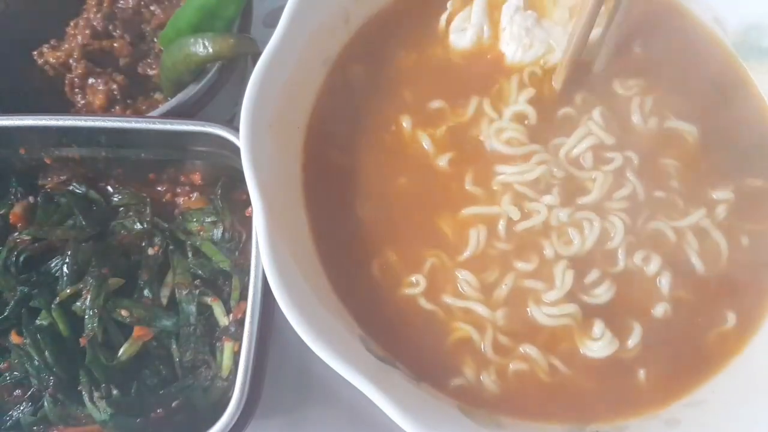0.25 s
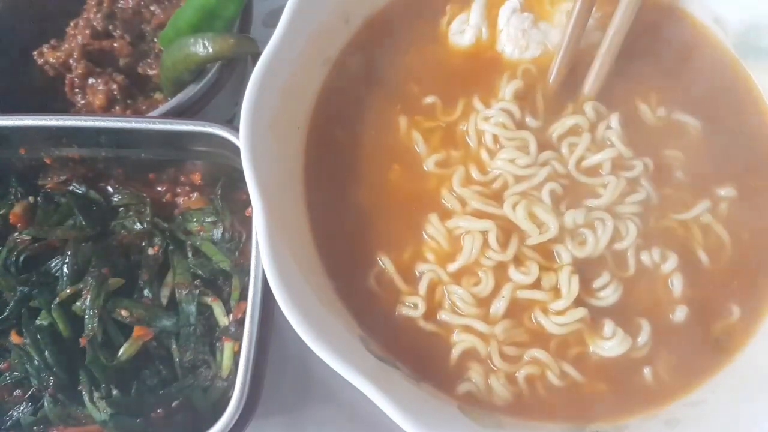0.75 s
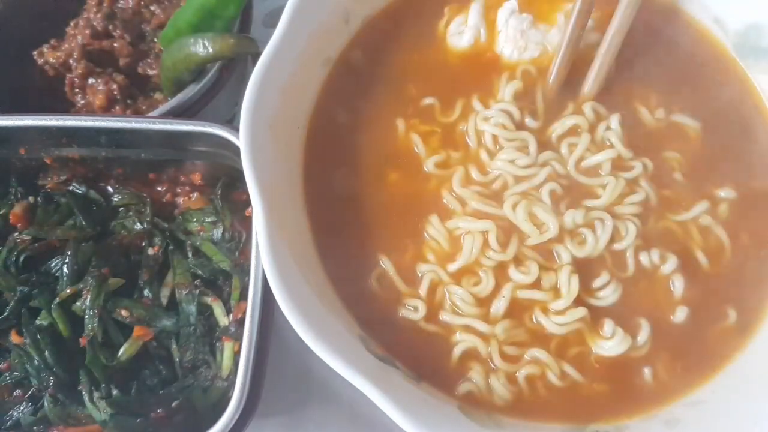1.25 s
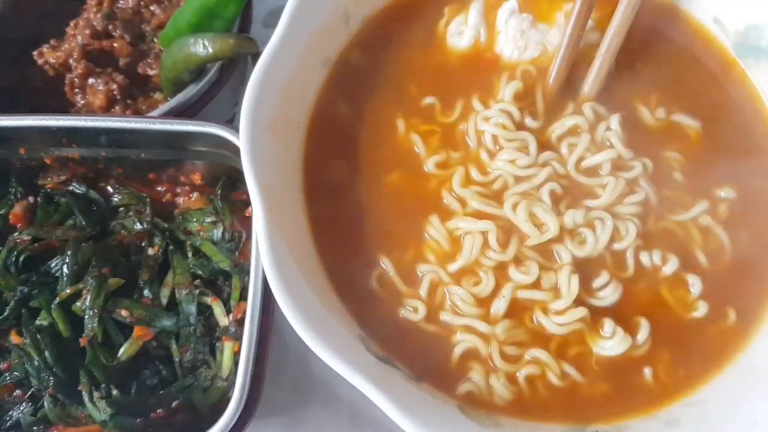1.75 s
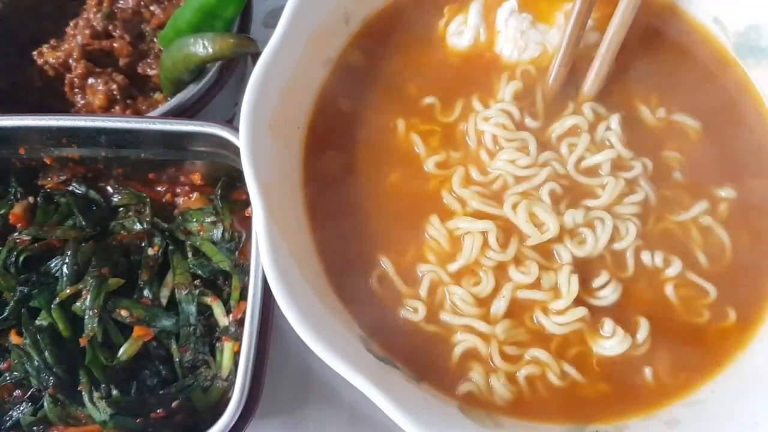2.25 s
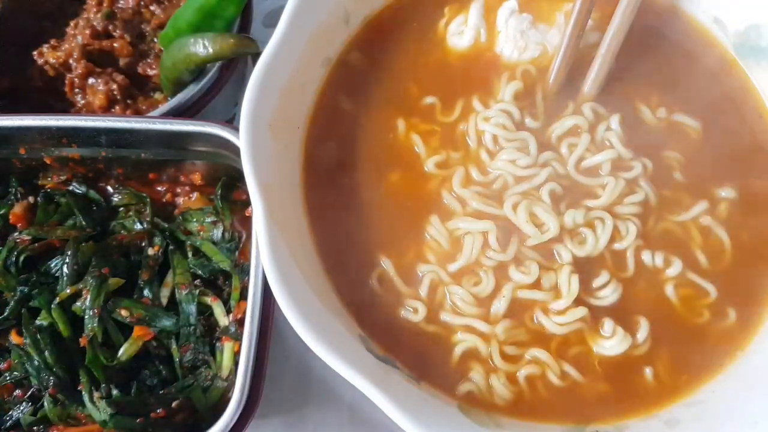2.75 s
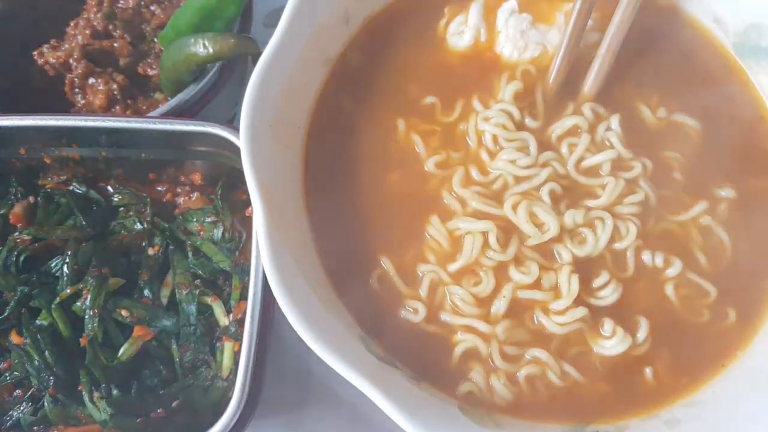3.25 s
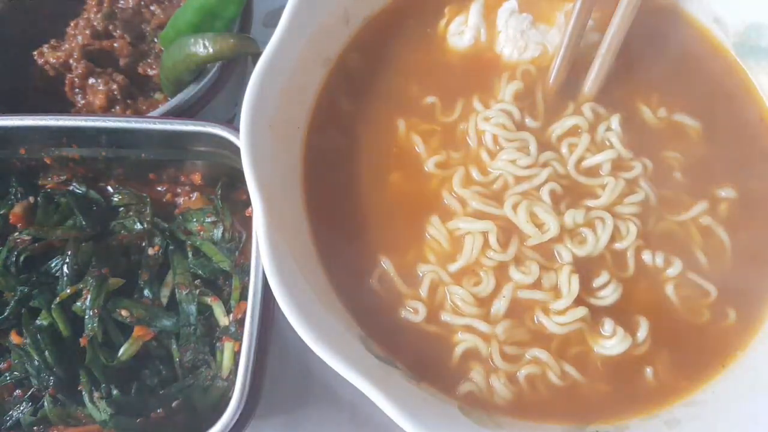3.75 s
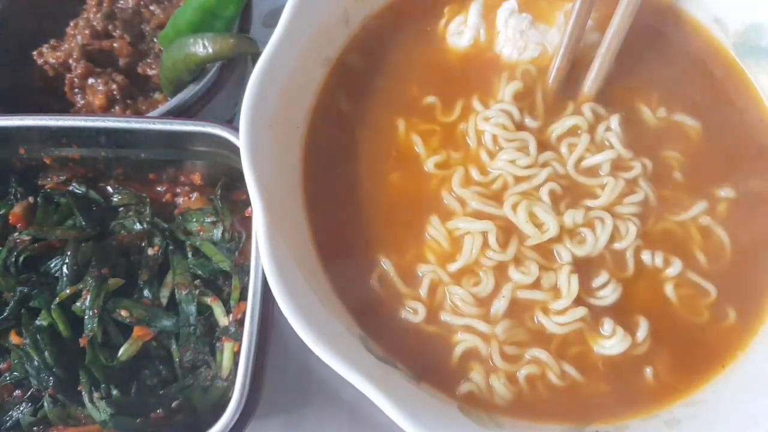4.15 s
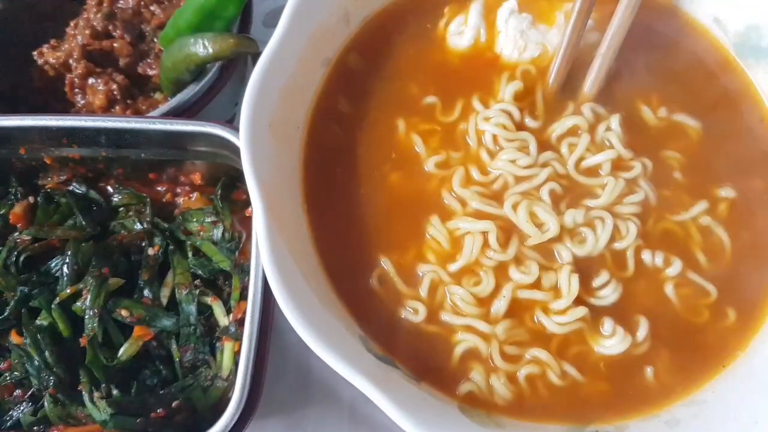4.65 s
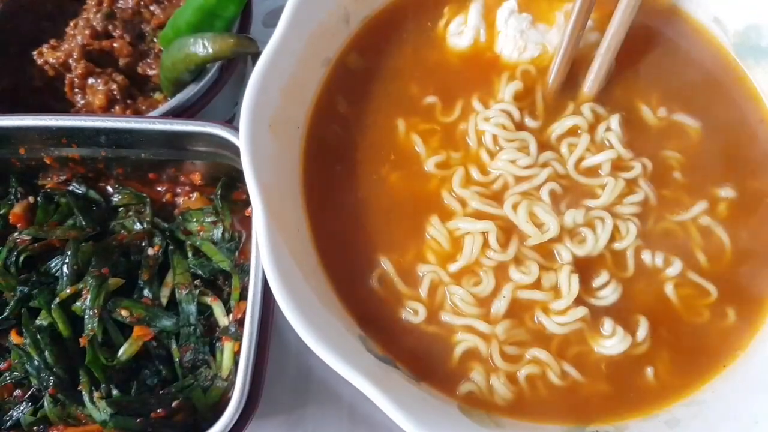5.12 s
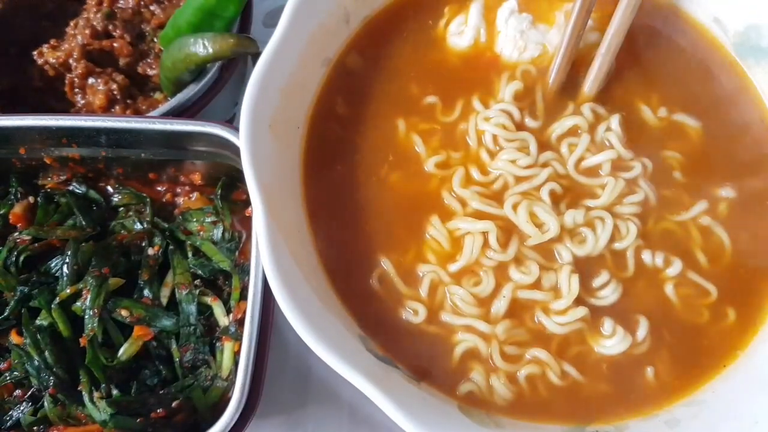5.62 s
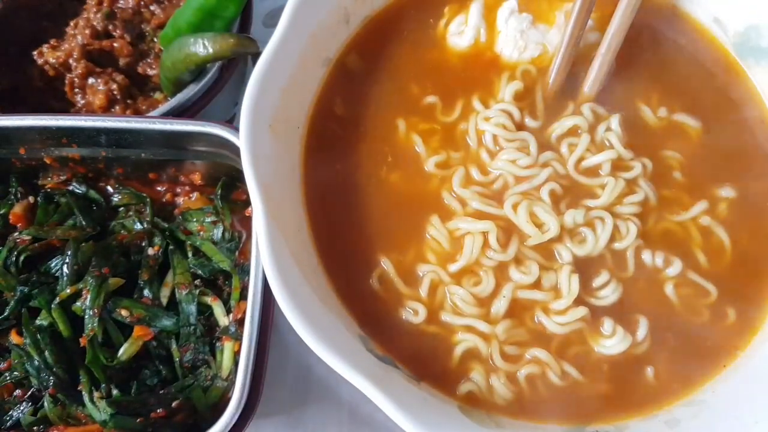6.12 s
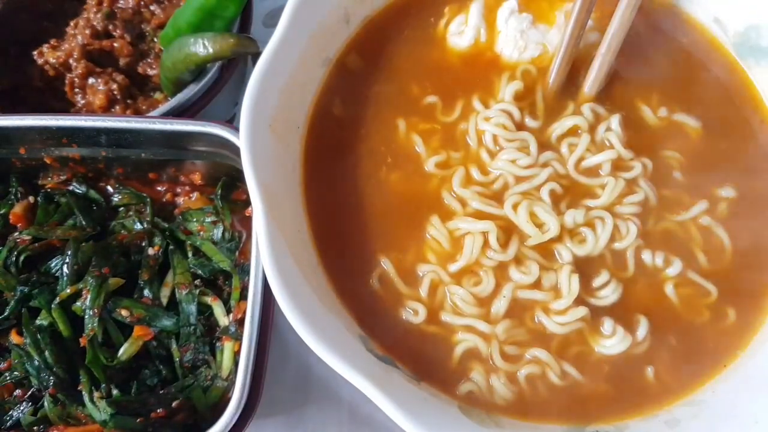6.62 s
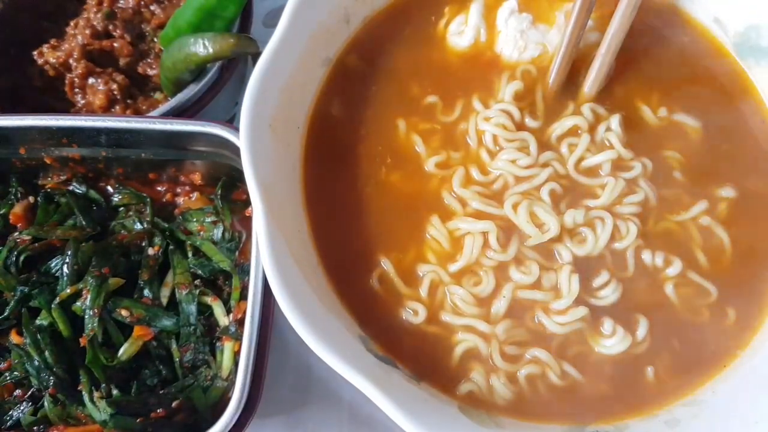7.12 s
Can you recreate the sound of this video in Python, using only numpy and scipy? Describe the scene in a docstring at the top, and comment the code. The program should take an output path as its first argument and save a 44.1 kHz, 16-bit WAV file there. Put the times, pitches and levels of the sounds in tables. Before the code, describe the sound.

After a dish is set down and a quiet pause, wooden sticks click, rub and knock on a ceramic bowl, then a soft hiss remains.

```python
"""Chopsticks click against a ceramic bowl on a table, close by in a small hard room.
Each contact is a short hollow clack, a bright snap of noise and a knock of the bowl, which rings on faintly.
Bumps ring the table top, a dish is set down at the start, and sliding sticks rub and catch.
Below: filtered-noise rumble, hiss, brushing and rustles, sine-wave hum and whine, faint taps and rings."""
import sys
import numpy as np
from scipy import signal
from scipy.fft import rfft, irfft, next_fast_len
from scipy.io import wavfile
from scipy.ndimage import map_coordinates

SR = 44100
rng = np.random.default_rng(int(sys.argv[2]) if len(sys.argv) > 2 else 0)


def to_wav(sig):
    """Store sig (one row per channel, or 1-D mono) as 16-bit WAV at the path in sys.argv[1].

    Samples outside -1..1 are clipped; the rate is SR.
    """
    pcm = np.clip(np.atleast_2d(sig), -1, 1) * 32767
    pcm = np.round(pcm).astype(np.int16)
    wavfile.write(sys.argv[1], SR, pcm.T)  # frames by channels


N = 325458  # length of the scene [samples]

# Levels in the tables are relative: each function sets how loud its own sound ends up.


def amp(db):
    """Turn decibels into a gain."""
    return np.exp(np.asarray(db) * (np.log(10) / 20))


def unit(x):
    """Scale to rms 1."""
    return x / np.sqrt(np.mean(x ** 2) + 1e-20)


def along(points, hz):
    """Read a curve of (Hz, value) points at any frequency, on a log axis."""
    f, v = np.transpose(points)
    return np.interp(np.log(hz + 1), np.log(f + 1), v)


def curves(rows):
    """Join the points of each column after the time into one value per sample."""
    times, *columns = np.transpose(rows)
    return [np.interp(np.arange(N) / SR, times, column) for column in columns]


def wobble(rate):
    """Draw a smooth random curve with this many random points a second."""
    points = rng.standard_normal(int(N * rate / SR) + 4)
    return map_coordinates(points, [np.arange(N) * rate / SR])


def filtered(x, response):
    """Change the sound's spectrum by a response, given as a function of frequency."""
    n = x.shape[-1]
    m = next_fast_len(n + 8192)  # spare room so that echoes do not wrap round
    return irfft(rfft(x, m) * response(np.fft.rfftfreq(m, 1 / SR)), m)[..., :n]


def add(track, s, sound):
    """Mix a sound into the track at time s."""
    start = max(round(s * SR), 0)
    track[..., start:start + sound.shape[-1]] += sound[..., :N - start]


def struck(modes, detune, chatter, chatter_t60, alternate=True):
    """A blow and its brief chatter ring fading tones; alternating signs swell, equal signs start at once."""
    t = np.arange(SR // 8) / SR
    hz, db, t60 = np.transpose(modes)[:, :, None]
    pitch, level = rng.standard_normal((2, len(modes), 1))
    sign = (-1) ** np.arange(len(modes))[:, None] if alternate else 1
    tones = np.sin(2 * np.pi * hz * (1 + detune * pitch) * t)
    ring = (sign * amp(db + 2.2 * level - 60 * t / t60) * tones).sum(0)
    force = rng.standard_normal(len(t)) * amp(-60 * t / chatter_t60)
    force *= chatter / np.linalg.norm(force)
    force[0] += 1  # the blow itself
    sound = signal.fftconvolve(ring, force)[:len(t)]
    return sound / np.linalg.norm(sound)  # energy 1


# how long the room rings: (frequency [Hz], time to fade 60 dB [s])
ROOM_FADE = [(150, 0.11), (500, 0.47), (1400, 0.41), (3700, 0.34), (10000, 0.38), (15000, 0.1)]
# how strongly the room answers: (frequency [Hz], level [dB])
ROOM_COLOUR = [(100, -6.5), (400, 3.5), (1300, -1), (2500, -1.3), (5000, 0), (7800, -5), (10000, -5),
               (14000, -5.5)]


def room(bands, gap=0.0045, build=0.0018):
    """The walls answer with fading noise in bands (Hz, octaves, dB), unrelated at the two microphones."""
    hz, t, noise = signal.stft(rng.standard_normal((2, SR * 3 // 5)), SR, nperseg=256)
    power = np.zeros(len(hz))
    for centre, octaves, db in bands:
        shape = np.exp(-.5 * (np.log2((hz + 1) / centre) / octaves) ** 2)
        power += amp(db) ** 2 * shape / shape.mean()
    decay = amp(-60 * t / along(ROOM_FADE, hz)[:, None])
    gain = np.sqrt(power) * amp(along(ROOM_COLOUR, hz))
    tail = signal.istft(noise * decay * gain[:, None], SR, nperseg=256)[1]
    # the answer starts after a short gap [s] and builds up
    late = np.maximum(np.arange(tail.shape[1]) / SR - gap, 0)
    return tail * (1 - np.exp(-late / build)) / np.sqrt(np.mean(decay ** 2) * tail.shape[1])


# nearby surfaces: (delay [s], gain left, gain right)
EARLY_ECHOES = [(.0088, 0.93, .7), (0.014, -0.2, 0.3), (.0195, .35, -.4)]


def early_walls(x, db=-12, soft_hz=1600):
    """Nearby surfaces return a few dull, distinct echoes."""
    out = np.zeros((2, N))
    dull = filtered(x, lambda hz: 1 / (1 + 1j * hz / soft_hz))
    for delay, left, right in EARLY_ECHOES:
        add(out, delay, amp(db) * np.outer([left, right], dull))
    return out


# what reaches the further microphone: (frequency [Hz], level [dB])
FAR_MICROPHONE = [(100, -1), (1000, -5.5), (2600, -1), (6000, -3), (10000, -16.5), (13000, -10.5)]


def from_left(x, lag=0.000363):
    """A near source on the left reaches the further microphone later (lag in s) and duller."""
    far = filtered(x, lambda hz: amp(along(FAR_MICROPHONE, hz)) * np.exp(-2j * np.pi * hz * lag))
    return amp(3.5) * np.array([x, far])


# how alike the two channels are: (frequency [Hz], likeness from 0 to 1)
ALIKE = [(60, 0.86), (200, 1), (500, 0.51), (1200, 0.28), (3000, 0.13), (10000, .1)]


def air(spectrum, lag=0.00036):
    """Stereo noise of rms 1, alike in the bass, mostly unrelated in the treble; a lag [s] delays the left."""
    def turn(hz):
        return np.arccos(np.clip(along(ALIKE, hz), -1, 1)) / 2

    def split(hz):
        return amp(along(spectrum, hz)) * [np.cos(turn(hz)), np.sin(turn(hz))]

    mid, side = filtered(rng.standard_normal((2, N)), split)
    left = filtered(mid + side, lambda hz: np.exp(-2j * np.pi * hz * lag))
    return unit(np.array([left, mid - side]))


# colour of the room's rumble: (frequency [Hz], level [dB per Hz])
RUMBLE = [(20, -28.5), (33, -28.5), (45, 1.5), (80, -4), (110, 0.5), (145, 0.5), (240, 3.5), (380, -2.5),
          (550, -3.5), (800, -10.5), (1100, -20.5), (1400, -17), (2000, -48), (4000, -54.5)]
# colour of the hiss: (frequency [Hz], level [dB per Hz])
HISS = [(1000, 4), (2500, 3), (4000, 0), (6000, -2), (7800, -6), (9500, -1), (14500, 1)]


def background(rumble_db=-55, hiss_db=-75.5):
    """Room rumble that barely drifts, and steady hiss, both made of filtered noise."""
    drift = amp(.5 * wobble(2) + .8 * wobble(12))
    rumble = amp(rumble_db) * drift * air(RUMBLE) * amp([[.3], [-.3]])
    return rumble + amp(hiss_db) * air(HISS)


# loudness of the hum's lowest tone: (time [s], level [dB])
HUM = [(0.0, -65.5), (0.61, -52), (0.9, -77), (1.23, -50), (1.56, -65.5), (2.28, -56.5), (2.69, -72),
       (2.88, -60), (3.91, -59), (4.4, -67), (4.6, -54), (4.95, -84), (5.2, -52), (5.51, -75.5),
       (5.65, -54.5), (6.1, -75), (6.31, -56), (6.74, -90.5), (7.01, -63), (7.38, -95.5)]
# loudness of the whine before its flutter: (time [s], level [dB])
WHINE = [(0, -72), (.7, -73), (1.1, -78), (1.8, -80), (2.3, -72.5), (2.8, -71), (3.0, -66), (3.2, -72),
         (3.8, -80), (6.3, -75.5), (6.8, -72), (7.15, -66.5), (7.38, -69)]
WHINE_FLUTTER_DB = 1.8


def appliance(mains_hz=59.3, whine_hz=3058, hum_db=0, whine_db=0, whine_left_db=-17):
    """A wavering mains hum with overtones, and on the right a thin whine that swells and wanders in pitch."""
    t = np.arange(N) / SR
    phase = 2 * np.pi * mains_hz * t + 0.3 * wobble(4.9)
    hum = amp(curves(HUM)[0] + hum_db) * np.sin(phase)
    for order, db in enumerate([-85.5, -80.0, -70.5, -90.5, -74.0], 2):  # overtones 2 to 6
        hum += amp(db + wobble(2.5)) * np.sin(order * phase + .5 * wobble(7.6))
    wander = 0.35 * wobble(65) + 0.41 * wobble(200)
    whine_level = amp(curves(WHINE)[0] + whine_db + WHINE_FLUTTER_DB * wobble(14))
    whine = whine_level * np.sin(2 * np.pi * whine_hz * t + wander)
    return np.sqrt(2) * (hum * amp([[.8], [-.8]]) + whine * amp([[whine_left_db], [0]]))


# colour of the brushing: (frequency [Hz], level [dB per Hz])
BRUSH = [(1500, -7.5), (4500, -8), (7500, -7), (9500, -1.5), (11000, -2), (12200, 3), (13500, 4),
         (14500, -1)]
# loudness of the brushing: (time [s], level [dB])
BRUSHING = [(5.95, -72), (6.35, -66.5), (6.5, -71), (6.666, -63.5), (6.82, -72), (7.08, -69), (7.2, -71),
            (7.38, -86)]


def brushing(brush_db=3, fade_s=0.12):
    """A smooth, high brushing hiss of filtered noise fades in as the clatter ends."""
    fade = np.clip((np.arange(N) / SR - BRUSHING[0][0]) / fade_s + 1, 0, 1)
    level = amp(curves(BRUSHING)[0] + brush_db + 0.86 * wobble(57))
    return fade * level * air(BRUSH, lag=0)


# soft rustles: (time of the peak [s], level [dB], centre [Hz], width [octaves], half length [s])
RUSTLES = [(1.77, -72, 2350, 0.33, 0.2), (3.113, -70, 2680, 0.17, 0.04), (3.92, -66, 3700, 0.5, 0.028),
           (1.402, -67, 11000, 0.5, 0.016), (3.92, -69, 10500, 0.5, 0.028)]


def rustles():
    """Soft rustles, each a band of noise that swells and fades."""
    t = np.arange(N) / SR
    out = np.zeros((2, N))
    for s, db, centre, octaves, half_length in RUSTLES:
        def band(hz):
            return np.exp(-(np.log2((hz + 1) / centre) / octaves) ** 2)

        swell = np.exp(-((t - s) / half_length) ** 2)
        out += amp(db) * swell * unit(filtered(rng.standard_normal((2, N)), band))
    return out


# sliding rings: (time [s], level [dB], first pitch [Hz], last pitch [Hz], time to fade 60 dB [s], width [Hz])
RINGS = [(0.034, -47, 1996, 1650, 0.28, 290), (0.681, -61.5, 1750, 1480, 0.42, 380),
         (1.917, -53.5, 1552, 1570, 0.63, 220)]


def sliding_rings(glide=0.077):
    """Faint, rough rings, each a narrow band of noise that slides in pitch as it fades."""
    out = np.zeros((2, N))
    t = np.arange(SR // 2) / SR
    for s, db, first_hz, last_hz, t60, width_hz in RINGS:
        pitch_hz = last_hz + (first_hz - last_hz) * np.exp(-t / glide)
        phase = 2 * np.pi * np.cumsum(pitch_hz) / SR
        slow_noise = filtered(rng.standard_normal((2, 2, len(t))), lambda hz: 1 / (1 + (2 * hz / width_hz) ** 2))
        a, b = unit(slow_noise)
        band = (a * np.sin(phase) + b * np.cos(phase)) / np.sqrt(2)
        add(out, s, amp(db - 60 * t / t60) * (1 - np.exp(-t / 0.0017)) * band)
    return out


# faint taps further off: (time [s], level [dB], pitch [Hz], time to fade 60 dB [s])
TAPS = [(0.574, -41.5, 1210, 0.029), (0.6242, -50.5, 2500, 0.011), (0.67, -41.5, 1190, 0.0094),
        (1.179, -53, 2350, 0.0091), (1.522, -46, 1270, 0.049), (1.914, -53, 1570, 0.0072),
        (1.928, -46.5, 1520, 0.013)]


def taps(tap_db=13, tick_db=-9, room_db=-1, dull_hz=4200):
    """Small taps further off: a soft tick and one blurred pitch, with the treble dulled."""
    out = np.zeros((2, N))
    for s, db, hz, t60 in TAPS:
        tap = struck([(hz, 0, t60)], detune=0.023, chatter=0.83, chatter_t60=0.058)
        tap += amp(tick_db) * struck([(1.5 * hz, 0, .003)], detune=.05, chatter=2, chatter_t60=.015)
        tap = signal.lfilter(*signal.butter(2, dull_hz, fs=SR), tap)
        add(out, s, amp(db + tap_db) * tap)
        add(out, s, amp(db + tap_db + room_db) * room([(0.82 * hz, .4, 0)]))
    return out


# colour of the snap, and of the dish's scrape: (frequency [Hz], level [dB per Hz])
SNAP = [(1500, -25), (3300, -5), (4300, 13.5), (5400, -0.5), (6600, 6), (7800, -6.5), (9600, 8),
        (11200, -2.5), (12700, 4), (14500, -9.5)]
SNAP_T60_S = 0.008  # the grating's time to fade 60 dB
SNAP_PIVOT_HZ = 8000  # the pitch about which the snap tilts


def snap(tilt_db, grit=1.45):
    """The broad crack of a hard tip: one spike and a brief grating, brighter or duller by its tilt."""
    t = np.arange(SR // 40) / SR
    force = rng.standard_normal(len(t)) * amp(-60 * t / SNAP_T60_S)
    force *= grit / np.linalg.norm(force)
    force[0] = 1

    def colour(hz):
        octaves = np.log2(np.maximum(hz, SNAP_PIVOT_HZ / 2) / SNAP_PIVOT_HZ)
        return amp(along(SNAP, hz) + tilt_db * octaves)

    sound = filtered(np.pad(force, (8, 0)), colour)
    return sound / np.linalg.norm(sound)  # energy 1


# the dish's clunks as it rocks to rest: (time [s], level [dB])
ROCKING = [(0.0312, -4.5), (0.0372, -13), (.0435, -12.5)]
# well-damped tones of the dish: (frequency [Hz], level [dB], time to fade 60 dB [s])
DISH = [(205, -3.5, 0.043), (550, 3, 0.1), (717, -0.5, 0.047), (1686, 2, 0.029), (1864, 4.5, 0.035),
        (1985, 6, 0.049), (2130, 2.5, 0.023), (3960, -6, 0.051), (4540, -18, 0.05)]


def dish(scrape_db=-14, scrape_t60=0.12, room_db=-9):
    """A dish is set down on the right: it rocks on its foot, scrapes and rings briefly."""
    out = np.zeros((2, N))
    for s, db in ROCKING:
        clunk = struck(DISH, detune=0.015, chatter=0.8, chatter_t60=0.03)
        t = np.arange(len(clunk)) / SR
        scrape = filtered(rng.standard_normal(len(t)), lambda hz: amp(along(SNAP, hz)))
        scrape *= amp(-60 * t / scrape_t60)
        clunk += amp(scrape_db) * scrape / np.linalg.norm(scrape)
        from_right = from_left(clunk)[::-1]
        add(out, s, amp(db) * from_right * amp([[-6], [1.5]]))
        add(out, s, amp(db + room_db) * room([(595, 0.14, -12), (1830, 0.11, -3), (6000, 1.0, -22)]))
    return out


# dull knocks against the bowl: (time [s], level [dB])
KNOCKS = [(3.3129, -24.5), (3.3722, -17), (3.3802, -13), (3.389, -18), (3.438, -21), (4.1068, -14),
          (4.1255, -14), (4.1549, -18.5), (4.7675, -20.5), (4.834, -22.5), (5.163, -17.5), (5.24, -27.5),
          (5.5525, -12), (5.6466, -5), (5.681, -13.5), (5.839, -14)]
# a click drives the bowl: level [dB] at strength and hardness 0, then dB per dB of strength and of hardness
BOWL_DB, BOWL_PER_STRENGTH, BOWL_PER_HARDNESS = -9, 0.67, 0.16


def bowl_blows():
    """All that knocks the bowl, as (s, dB): dull knocks, and each click by its strength and hardness."""
    from_clicks = [(s, BOWL_DB + BOWL_PER_STRENGTH * db + BOWL_PER_HARDNESS * hardness)
                   for s, db, hardness, tilt, hz in CLICKS]
    return KNOCKS + from_clicks


# heavier bumps on the table top: (time [s], level [dB], pitch as a multiple of the table's tones)
BUMPS = [(0.031, -32, 0.8), (0.231, -40, 0.6), (1.31, -38.5, 0.6), (3.333, -36, 1.05), (3.363, -31, 1.05),
         (3.384, -33, 0.8), (3.435, -30.5, 0.95), (4.109, -43, 1.3), (4.154, -43.5, 1.25),
         (4.292, -37.5, 1.2), (4.452, -36, 1.3), (5.122, -37.5, 1.2), (5.163, -32, 1.15), (5.24, -40, 1.2),
         (5.554, -39, 1.1), (5.606, -28, 0.95), (5.658, -31.5, 0.7), (5.681, -25, 0.62)]
# well-damped tones of the table top: (frequency [Hz], level [dB], time to fade 60 dB [s])
TABLE = [(93.8, -14.5, 0.21), (137.8, -5.5, 0.2), (208, -2, 0.028), (249.5, 5.5, 0.048), (330, -3, 0.044),
         (522, -10.5, 0.02)]
THROUGH_DB = -36.5  # the table's thud relative to the blow on the bowl, before bump_db


def table(bump_db=19, room_db=-7):
    """Dull bumps of hands and dishes ring the table top, and lighter thuds come down through the bowl."""
    near, walls = np.zeros(N), np.zeros((2, N))
    thuds = [(s, db + THROUGH_DB, 1) for s, db in bowl_blows()]
    for s, db, pitch in BUMPS + thuds:
        modes = [(pitch * hz, level, t60) for hz, level, t60 in TABLE]
        thump = struck(modes, detune=0.06, chatter=0.5, chatter_t60=0.08, alternate=False)
        add(near, s, amp(db + bump_db) * thump)
    for s, db, pitch in BUMPS:
        add(walls, s, amp(db + bump_db + room_db) * room([(300 * pitch, 0.29, 0)]))
    near = filtered(near, lambda hz: (1j * hz / (105 + 1j * hz)) ** 2)  # a board radiates little deep bass
    return from_left(near) + walls


# tones of a stick's clack: (multiple of its pitch, level [dB], time to fade 60 dB [s])
CLACK = [(0.621, -7.5, 0.007), (0.8, -3.5, 0.007), (0.929, -5, 0.018), (1.041, -4.5, 0.024),
         (1.17, -4, 0.008), (1.46, -8, 0.0067), (1.852, -8.5, 0.0057)]


def clack(pitch_hz, low_hz=1300):
    """A stick's hollow, quickly damped note; its pitch depends on where it is held and hit."""
    modes = [(k * pitch_hz, db, t60) for k, db, t60 in CLACK]
    note = struck(modes, detune=.035, chatter=.4, chatter_t60=.012, alternate=False)
    note = signal.lfilter(*signal.butter(2, low_hz, 'high', fs=SR), note)  # a thin stick radiates no bass
    return note / np.linalg.norm(note)  # energy 1


# rubbing strokes: (start time [s], length [s], level [dB])
STROKES = [(0.01, 0.044, -53.5), (1.434, 0.0084, -59.5), (3.36, 0.22, -60), (4.005, 0.57, -56),
           (4.693, 0.51, -70.5), (5.583, 0.22, -46.5), (6.639, 0.031, -64.5)]
STROKE_RISE_DB_PER_S, STROKE_FALL_DB_PER_S = 178.5, 130
IDLE_RUB_DB = -74  # the faint sliding that goes on between strokes


def stroke_pressure():
    """Each stroke swells, holds and dies away, over a faint unsteady sliding."""
    t = np.arange(N) / SR
    pressure = amp(IDLE_RUB_DB + 1.3 * wobble(3.4))
    for s, length, db in STROKES:
        early, late = np.maximum(s - t, 0), np.maximum(t - s - length, 0)
        stroke = amp(db - STROKE_RISE_DB_PER_S * early - STROKE_FALL_DB_PER_S * late)
        pressure = np.hypot(pressure, stroke)
    return pressure


# colour of the rubbing: (frequency [Hz], level [dB per Hz])
RUB = [(200, -1.5), (800, 5.5), (1400, -7), (2600, -1), (4000, -7.5), (7500, -17), (10000, -8.5),
       (14500, -13.5)]
# tiny catches: how many, how uneven in level, their usual pitch, and the snap over the clack
CATCHES_PER_S, CATCH_SPREAD_DB, CATCH_HZ, CATCH_SNAP_DB = 60, 4.5, 1900, -3.5


def rubbing(rub_db=-0.5, tick_db=-6.5):
    """Sliding makes an uneven rub of noise and tiny catches of stick on stick, each with its own note."""
    pressure = stroke_pressure()
    unevenness = amp(1.8 * wobble(300) + 1.8 * wobble(45))
    rub = amp(rub_db) * unit(unevenness * air(RUB, lag=0))
    catches = np.zeros(N)
    count = CATCHES_PER_S * N // SR
    times = rng.uniform(0, N / SR, count)
    for s, (size, pitch, tilt) in zip(times, rng.standard_normal((count, 3))):
        size_db = CATCH_SPREAD_DB * size
        add(catches, s, amp(size_db) * clack(CATCH_HZ * np.exp(.35 * pitch)))
        add(catches, s, amp(size_db + CATCH_SNAP_DB) * snap(4 * tilt))
    grip = pressure / pressure.max()  # catches stand out more when the sticks are pressed together
    return pressure * (rub + amp(tick_db) * np.sqrt(grip) * from_left(unit(catches)))


# the bowl's faint after-ring: (frequency [Hz], level [dB], time to fade 60 dB [s])
BOWL_RING = [(830, -6, 0.4), (909, -7, 0.4), (1084, -8, 0.35), (1262, -5, 0.3), (1303, -1, 0.4),
             (1390, -3, 0.4), (1485, -4, 0.35), (2583, 1, 0.3), (2837, 0, 0.3), (5270, -4, 0.2)]


def bowl_ring(ring_db=-5.5):
    """The soup damps the bowl, but a few faint notes outlast each knock."""
    out = np.zeros((2, N))
    t = np.arange(SR // 2) / SR
    hz, level, t60 = np.transpose(BOWL_RING)[:, :, None]
    notes = amp(level - 60 * t / t60) * np.exp(2j * np.pi * hz * t) * (1 - np.exp(-t / 0.0014))
    for s, db in bowl_blows():
        phase = rng.uniform(0, 2 * np.pi, (2, len(hz)))
        spread_db = 2 * rng.standard_normal(len(hz))
        ring = ((amp(spread_db) * np.exp(1j * phase)) @ notes).imag
        add(out, s, amp(db + ring_db) * ring / np.linalg.norm(ring[0]))
    return out


# chopstick contacts: (time [s], strength [dB], hardness: snap over clack before snap_db [dB],
# tilt of the snap [dB per octave], pitch of the clack [Hz])
CLICKS = [(0.0192, -43, 12.5, -10, 2670), (0.2124, -67, -2, 0, 2050), (0.218, -53.5, 17.5, 3, 2470),
          (0.229, -66, -6, 2, 2100), (0.2454, -64, 30, 9, 2250), (0.3836, -69.5, 26, 7, 2300),
          (1.4312, -37, 7, 9, 2530), (3.313, -46, 8, -7, 2280), (3.3637, -34.5, 4.5, -20, 2440),
          (3.3725, -21, -3, 13, 2870), (3.3805, -19.5, -3.5, -6, 2910), (3.3845, -41, -3, -2, 2530),
          (3.4378, -18.5, 3.5, 3, 2800), (3.4513, -23, 9.5, -2, 2370), (3.6469, -22.5, -4.5, -3, 2930),
          (3.891, -43, 3.5, -7, 3000), (3.9875, -16.5, 5, 8, 2510), (4.0552, -28, -2, 4, 2370),
          (4.1076, -37, 2, -4, 2320), (4.1261, -16.5, 7, 5.5, 2570), (4.1545, -13.5, 1.5, 2.5, 2600),
          (4.1628, -16, -14, -5, 2440), (4.2108, -28, -17, -8.5, 2750), (4.2205, -35, -15, -6, 2500),
          (4.265, -14, -4.5, -1, 2550), (4.283, -40, -2, -13, 2110), (4.2948, -25.5, 3.5, 1, 2500),
          (4.304, -33, 9.5, -2, 2300), (4.3238, -32, 2, 1, 2600), (4.3519, -32, -7, -8, 2460),
          (4.382, -33, -15, -7, 2250), (4.4412, -13.5, -4.5, -15, 2400), (4.452, -10.5, 1.5, 5.5, 2800),
          (4.472, -7.5, -13, -6, 2140), (4.618, -19, -5, 1, 2550), (4.6592, 2.5, 0.5, 8, 2615),
          (4.6895, -31.5, 6.5, -18, 2580), (4.733, -21, -8, -10, 2370), (4.803, -14, 3, 5.5, 2400),
          (4.9854, -12, 2, 2.5, 2310), (5.0204, -15, -7, -4, 2400), (5.0491, -25, -10, -7, 2400),
          (5.0706, -21, -10, 1, 2440), (5.121, -15.5, -5, -2.5, 2220), (5.1577, -26.5, 9.5, 9, 2190),
          (5.1842, -17.5, -8, -6, 2480), (5.243, -31.5, -16, -7.5, 2570), (5.56, -14.5, 0, 2.5, 2310),
          (5.586, -35, -6, -6, 2000), (5.5965, -25, -3, -6, 1950), (5.604, -17.5, 12, 5.5, 2600),
          (5.6215, -20, 11.5, 2, 2620), (5.66, -22.5, 17.5, -3, 2640), (5.667, -11.5, -14, -4, 2330),
          (5.677, -17, -9, 5, 2690), (5.6819, -12, -11, -6, 2330), (5.693, -19, -6, -2.5, 2010),
          (5.8306, -13.5, -5.5, -3, 2290), (5.84, -27, -15, -1, 1700)]
# well-damped low tones of the bowl: (frequency [Hz], level [dB], time to fade 60 dB [s])
KNOCK = [(345, -9.5, 0.013), (690, -3.5, 0.0049), (906, -2, 0.0075), (1066, -4.5, 0.0018),
         (1300, -2, 0.009), (1560, 0, 0.0027)]
# light contacts sound wetter than a clean, strong blow: dB of room per dB of strength
WET_PER_STRENGTH, USUAL_STRENGTH_DB = -0.15, -16.5


def chopsticks(clack_db=0, snap_db=1, room_db=-2.0, knock_room_db=-5.0):
    """Every contact clacks, snaps and knocks the bowl's low tones; the room blurs these into broad bands."""
    near, walls = np.zeros(N), np.zeros((2, N))
    for s, db, hardness, tilt, hz in CLICKS:
        add(near, s, amp(db + clack_db) * clack(hz))
        add(near, s, amp(db + hardness + snap_db) * snap(tilt))
        send_db = room_db + min(WET_PER_STRENGTH * (db - USUAL_STRENGTH_DB), 2)
        bands = [(0.88 * hz, 0.33, -1.7),
                 (5200, 0.42, hardness - 2.5 - 0.69 * tilt),
                 (12000, 0.33, hardness + 0.69 + 0.24 * tilt)]
        add(walls, s, amp(db + send_db) * room(bands))
    for s, db in bowl_blows():
        add(near, s, amp(db) * struck(KNOCK, detune=0.07, chatter=0.75, chatter_t60=0.06))
        add(walls, s, amp(db + knock_room_db) * room([(600, 1.0, 0.38), (1314, 0.4, 0.39)]))
    return from_left(near) + walls + early_walls(near)


def scene():
    """Everything on and around the table, mixed together."""
    faint = taps() + sliding_rings() + rustles() + brushing()
    handling = chopsticks() + bowl_ring() + table() + dish() + rubbing()
    return background() + appliance() + faint + handling


TOP_HZ = 14700  # upper band limit


def record(dry):
    """A very steep filter removes the treble above the band limit."""
    return filtered(dry, lambda hz: 1 / np.sqrt(1 + (hz / TOP_HZ) ** 140))


dry = scene()
out = record(dry)
to_wav(out)
```